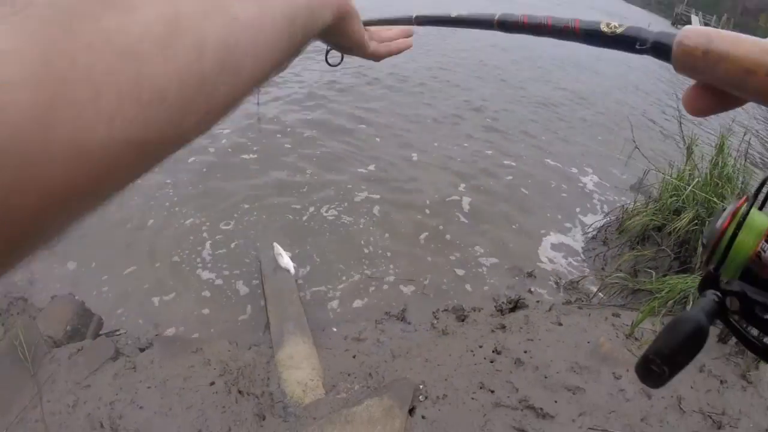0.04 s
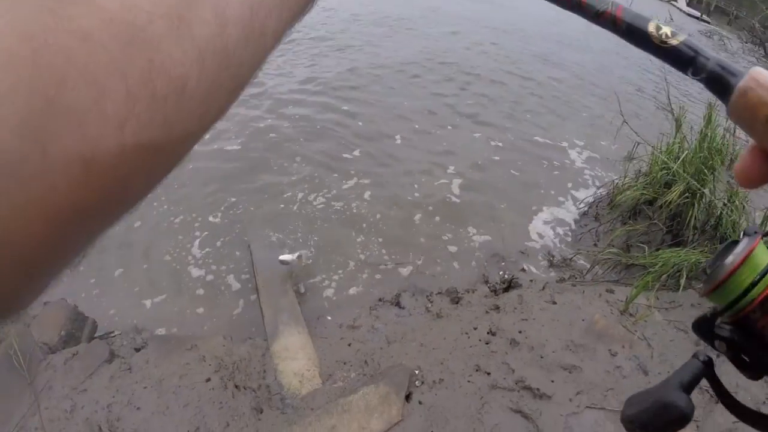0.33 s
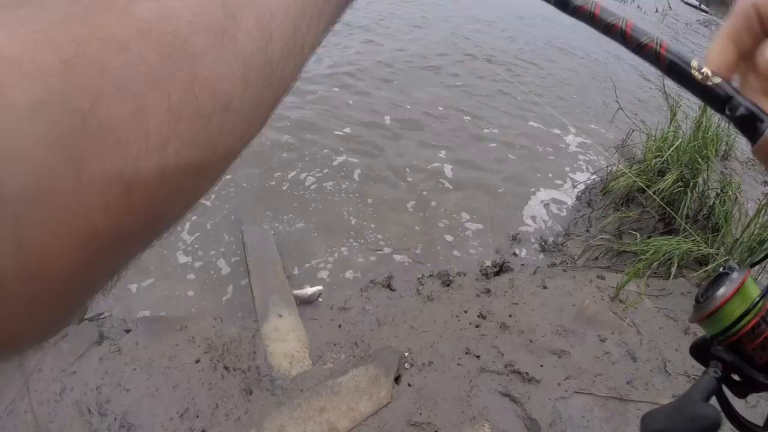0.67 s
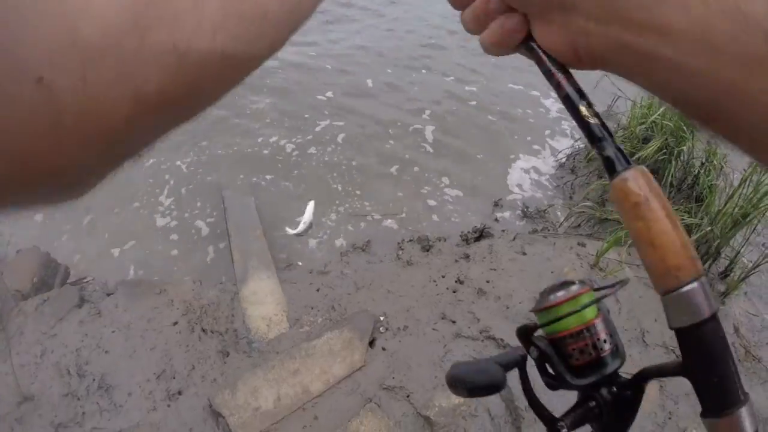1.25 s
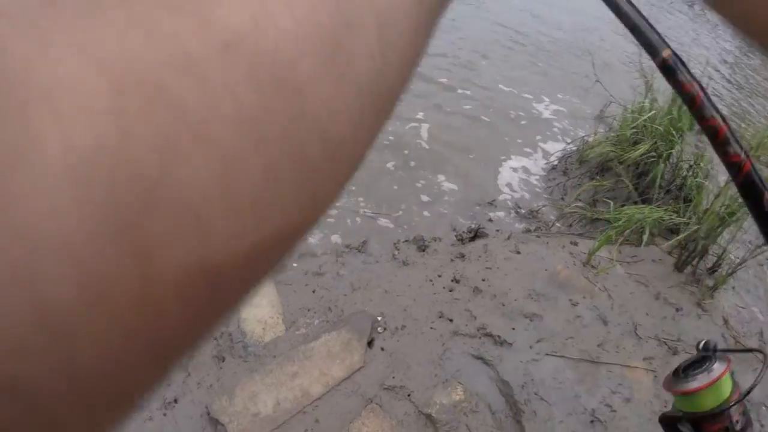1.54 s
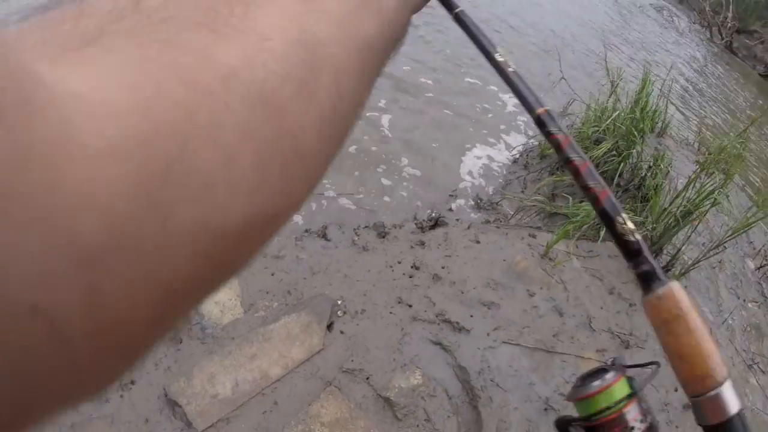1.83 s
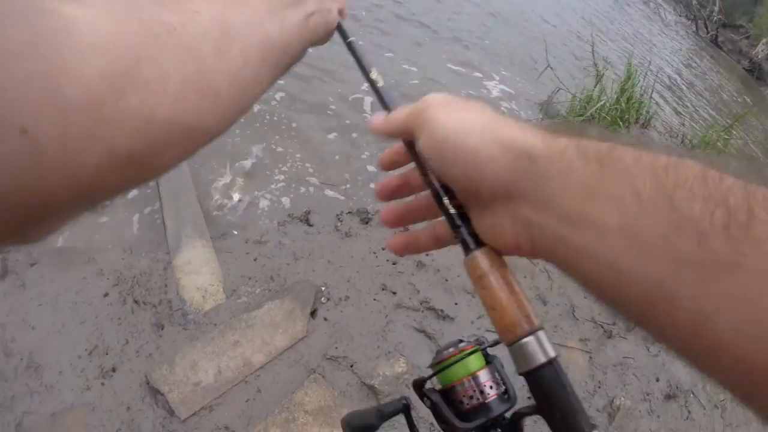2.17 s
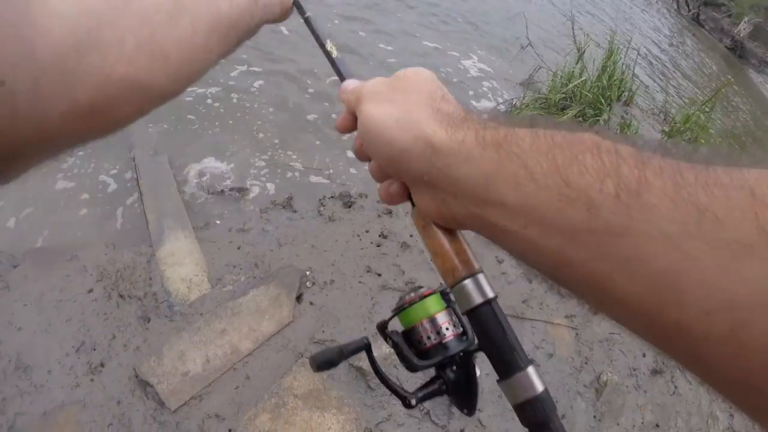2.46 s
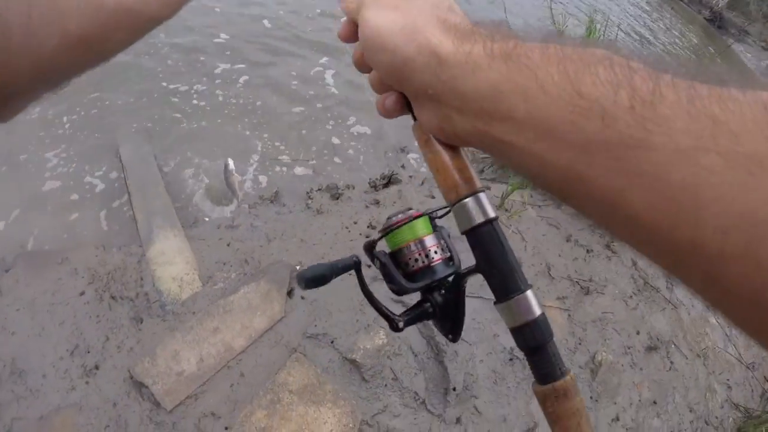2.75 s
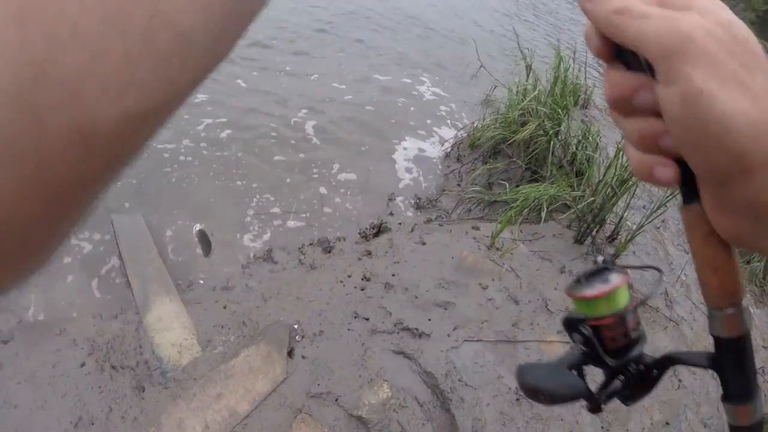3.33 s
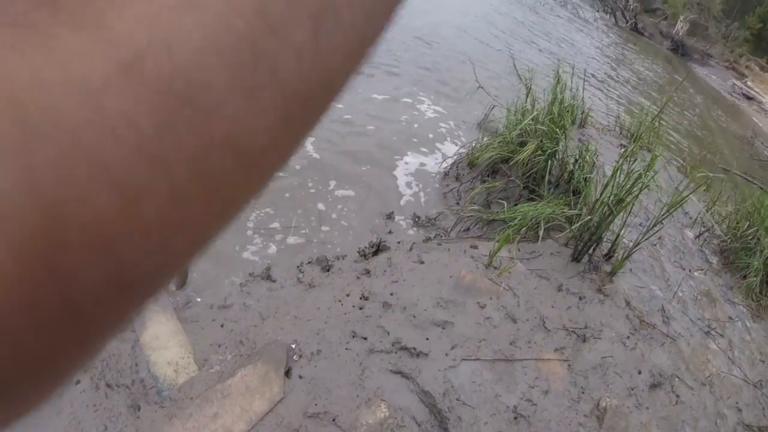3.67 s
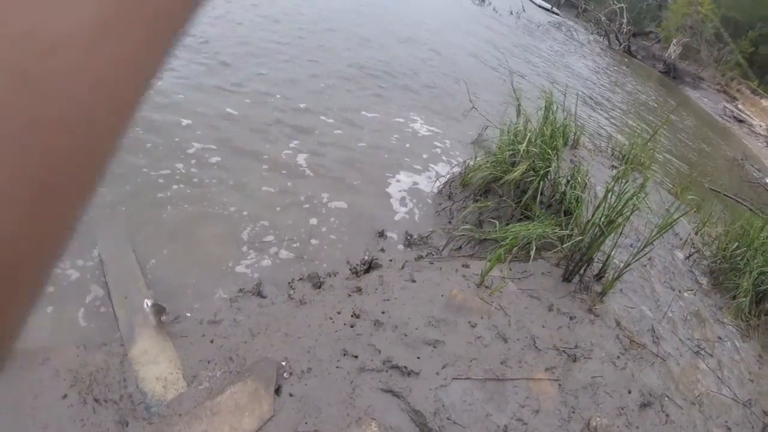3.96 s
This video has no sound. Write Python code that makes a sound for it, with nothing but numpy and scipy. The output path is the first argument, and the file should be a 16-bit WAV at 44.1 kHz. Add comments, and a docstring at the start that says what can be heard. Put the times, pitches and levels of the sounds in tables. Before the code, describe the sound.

A fishing rod and reel knock and click close by over rumbling wind.

```python
"""On a windy riverbank, a fishing rod and spinning reel are handled close to the microphone.
Turbulence rumbles and buffets, water laps faintly, and the wind sets up a low hum, probably in the line.
Friction makes a hand rub and squeak along the grip and the dragging rod scrape. Impacts excite damped
modes: the hand bumps, the steel of the reel ticks, and the rod knocks hollowly a few times.
Dry clicks are scattered throughout, and small wet blips sound in the second half."""
import sys
import numpy as np
from scipy import signal
from scipy.fft import rfft, irfft
from scipy.io import wavfile

SR = 44100
rng = np.random.default_rng(int(sys.argv[2]) if len(sys.argv) > 2 else 0)


def unload_wav(signal):
    """Save mono or channel-first audio to the path in sys.argv[1] as 16-bit WAV at rate SR, clipped to [-1, 1]."""
    wavfile.write(
        sys.argv[1],
        SR,
        np.round(np.clip(np.atleast_2d(signal).T, -1, 1) * 32767).astype(np.int16),
    )


N = 176400
BURST_SAMPLES = 8192


def amp(db):
    """Amplitude ratio of a level in decibels."""
    return 10 ** (np.asarray(db) / 20)


def unit(x):
    """Normalisation to rms 1."""
    return x / np.sqrt(np.mean(x ** 2) + 1e-20)


def curve(rows, column=1):
    """Linear interpolation of one column of a table over time."""
    rows = np.array(rows)
    return np.interp(np.arange(N) / SR, rows[:, 0], rows[:, column])


def add(mix, start, sound):
    """Superposition: a sound joins the mix at a start in seconds."""
    part = mix[max(round(start * SR), 0):][:len(sound)]
    part += sound[:len(part)]


def bins(size):
    """Fourier frequencies, raised by 1 Hz to stay above zero."""
    return np.fft.rfftfreq(size, 1 / SR) + 1


def colour(points, size, tilt_db=0):
    """Spectral envelope in dB, interpolated in log frequency and tilted by tilt_db per octave."""
    hz, db = np.transpose(points)
    return np.interp(np.log(bins(size)), np.log(hz), db) + tilt_db * np.log2(bins(size) / hz.mean())


def filtered(x, gain):
    """Linear filtering: the spectrum is multiplied by a gain at each frequency."""
    return irfft(rfft(x) * gain, len(x))


def noise(points, size=N):
    """Gaussian noise with a given spectral envelope, at rms 1."""
    return unit(filtered(rng.standard_normal(size), amp(colour(points, size))))


def drift(hz):
    """Slow random modulation: low-passed noise at rms 1."""
    return unit(filtered(rng.standard_normal(N), 1 / (1 + (bins(N) / hz) ** 4)))


def dying(t, t60):
    """Exponential damping by 60 dB in t60 seconds."""
    return np.exp(-np.log(1000) * t / t60)


def burst(spectrum_db, t60, top_hz=10900):
    """Contact noise: a dying train of micro-impacts through a minimum-phase filter, dull above top_hz."""
    t = np.arange(BURST_SAMPLES) / SR
    gain = amp(np.maximum(spectrum_db - spectrum_db.max(), -80))
    log_gain = np.log(unit(gain) / (1 + (bins(BURST_SAMPLES) / top_hz) ** 8))
    mirrored = np.r_[log_gain, log_gain[-2:0:-1]]
    response = np.exp(np.conj(signal.hilbert(mirrored)))[:len(gain)]
    impacts = rng.choice([-1., 1.], BURST_SAMPLES) * dying(t, t60)
    return filtered(impacts, response)


def ring(modes, swell_s=0):
    """Free vibration of damped modes; the lowest builds up over swell_s, higher ones faster."""
    t = np.arange(SR // 2) / SR
    out = np.zeros(len(t))
    for k, (hz, db, t60) in enumerate(modes):
        polarity = (-1) ** (k // 2)  # neighbouring pairs swing in opposite directions
        swell = 1 - np.exp(-t * (hz / modes[0][0]) ** 2 / (swell_s + 1e-9))
        out += polarity * amp(db) * swell * dying(t, t60) * np.sin(2 * np.pi * hz * t)
    return out


def wind():
    """Turbulent pressure at the microphone: a rumble, and fine eddies that grow faster in a gust."""
    # Each row: time in seconds, rumble level in dB.
    gusts = [(0, -32.5), (.08, -24.5), (.2, -19), (.5, -22.5), (.8, -23), (1.05, -19.5), (2, -33.5),
             (2.65, -25), (3.25, -31), (3.35, -20.5), (3.62, -19), (4, -16)]
    # Spectra of the rumble and the eddies. Each row: frequency in Hz, relative level in dB.
    rumble_spectrum = [(10, -5.5), (28, 3), (55, 0.5), (90, -2.5), (145, -10), (200, -20.5), (300, -31.5),
                       (600, -70), (1500, -82.5)]
    eddy_spectrum = [(40, -15), (130, 10), (230, 1.5), (350, -17.5), (600, -17.5), (1100, -21.5),
                     (2500, -55), (9000, -73.5)]
    eddy_growth, reference_db = 2.4, -17.5
    gust_db = curve(gusts)
    rumble = amp(gust_db) * noise(rumble_spectrum)
    eddy_db = -34 + eddy_growth * (gust_db - reference_db) + 3.6 * drift(hz=30)
    return rumble + amp(eddy_db) * noise(eddy_spectrum)


def river():
    """Lapping water: broadband noise under slight amplitude modulation."""
    # Each row: frequency in Hz, relative level in dB.
    wash_spectrum = [(120, -13), (200, -2), (420, -4.5), (708, -8), (1050, -17), (1980, -22.5), (3870, -37),
                     (9050, -37.5), (12500, -47), (15000, -59.5)]
    return amp(-46.5 - 0.3 * drift(hz=7.6)) * noise(wash_spectrum)


def hum():
    """Wind-driven vibration: a wavering tone with a faint overtone, rising slightly as the rod lifts."""
    # Each row: time in seconds, frequency in Hz, level in dB.
    tone = [(0, 92, -50), (1.5, 89, -30.5), (1.8, 88.9, -31), (2.03, 95.6, -31), (2.13, 98.5, -24.5),
            (2.35, 100.2, -21.5), (2.48, 101, -26.5), (2.7, 101.8, -28), (3.1, 104.2, -21.5),
            (3.4, 105.8, -28), (4, 106.4, -19.5)]
    hz = curve(tone) * (1 + 0.013 * drift(hz=8.7))
    phase = 2 * np.pi * np.cumsum(hz) / SR
    level_db = curve(tone, column=2) - 1.5 * drift(hz=5.3)
    return amp(level_db) * (np.sin(phase) + amp(-26.5) * np.sin(3.2 * phase))


def rub():
    """Sliding friction of skin on the grip: grainy slips, with squeaks that grow under pressure."""
    # Each row: time in seconds, rubbing level in dB.
    strokes = [(0, -60), (.08, -56), (.15, -55.5), (.22, -57), (.29, -52.5), (.45, -53), (.485, -46.5),
               (.6, -51.5), (.77, -45.5), (.92, -49.5), (1.02, -57), (1.12, -51.5), (1.21, -50.5),
               (1.3, -62), (2.02, -55), (2.17, -48), (2.28, -51), (2.38, -48), (2.52, -50.5), (2.62, -43.5),
               (2.8, -54), (2.9, -46), (3.03, -54), (3.18, -53), (3.35, -59.5)]
    # Each row: frequency in Hz, relative level in dB.
    grip_spectrum = [(200, 4), (600, 15.5), (1200, 2.5), (2500, 3), (4300, 0.5), (5900, -2), (7000, -10),
                     (9500, -11.5), (13000, -25)]
    slips_per_s, spread_db, squeak_growth = 2200, 1.36, 1.25
    slips = (rng.random(N) < slips_per_s / SR) * rng.choice([-1, 1], N)
    strength = amp(spread_db * np.minimum(rng.exponential(1, N), 4))
    roughness = amp(3.7 * drift(hz=59.4))
    grains = unit(filtered(slips * strength * roughness, amp(colour(grip_spectrum, N))))
    rub_db = curve(strokes)
    squeak_db = -48 + squeak_growth * (rub_db - rub_db.max())
    return amp(rub_db) * grains + amp(squeak_db) * squeaks(spread_db)


def squeaks(spread_db, slips_per_s=300, pitches=24, rise_cycles=2.8):
    """Stick-slip motion of skin: each release is a brief oscillation at its own pitch."""
    out, t = np.zeros(N), np.arange(1024) / SR
    for hz in np.geomspace(1000, 5400, pitches):
        slips = rng.random(N) < slips_per_s / pitches / SR
        strength = amp(spread_db * np.minimum(rng.exponential(1, N), 3))
        age = hz * t / rise_cycles
        squeak = age * np.exp(-age) * np.sin(2 * np.pi * hz * t) * np.sqrt(hz)
        out += signal.oaconvolve(slips * strength, squeak)[:N]
    return unit(out)


def scrape():
    """Friction noise of the dragging rod, hollow in colour and uneven in level."""
    # Each row: time in seconds, level in dB.
    drags = [(.065, -71), (.088, -37), (.17, -76), (.64, -70), (.68, -29), (.8, -36), (.93, -32.5),
             (1.1, -81), (1.25, -86)]
    # Each row: frequency in Hz, relative level in dB.
    hollow_spectrum = [(200, -7.5), (500, 4.5), (850, 3.5), (1150, -22.5), (1700, -18.5), (5000, -58.5)]
    return amp(curve(drags) + 2 * drift(hz=50)) * noise(hollow_spectrum)


def clicks():
    """Dry contacts of fingers, line and reel seat, each exciting one broad resonance."""
    # Each row: start in seconds, level in dB, centre in Hz, width in octaves, t60 in seconds.
    contacts = [(0.099, -37, 4100, 0.71, 0.018), (0.166, -35, 4200, 0.92, .022),
                (0.214, -34.5, 3330, 0.35, 0.024), (0.4211, -19.5, 3480, 0.71, 0.0054),
                (0.7026, -31, 1410, 0.18, 0.059), (1.039, -44, 7900, 0.76, 0.0099),
                (1.105, -33.5, 4500, 0.89, 0.02), (1.748, -51, 2340, 0.54, 0.16),
                (2.156, -28.5, 2200, 0.44, 0.0097), (2.2145, -30, 3600, 0.62, 0.011),
                (2.4558, -35, 2280, 1.7, 0.022), (2.5876, -39, 6500, 1.1, 0.019),
                (2.599, -33, 3830, 0.51, 0.0096), (2.674, -37.5, 4370, 0.28, 0.029),
                (2.8571, -35.5, 4003, 0.7, 0.02), (2.9505, -36.5, 4100, 0.29, 0.026),
                (3.821, -37, 2840, 0.54, 0.0075)]
    out = np.zeros(N)
    for start, db, hz, octaves, t60 in contacts:
        detuning = np.log2(bins(BURST_SAMPLES) / hz) / octaves
        resonance_db = -36 * np.log10(1 + detuning ** 2)
        add(out, start, amp(db) * burst(resonance_db, t60))
    return out


def bumps():
    """Soft impacts of the hand on the rod excite two low, heavily damped modes."""
    # Each row: start in seconds, then the lower mode's level in dB, frequency in Hz and t60 in seconds.
    impacts = [(0.104, -19.5, 162, 0.13), (0.969, -20, 167, 0.16), (1.723, -25.5, 323, 0.056),
               (2.157, -22.5, 295, 0.083), (2.453, -24.5, 230, 0.052)]
    out = np.zeros(N)
    for start, db, hz, t60 in impacts:
        add(out, start, amp(db) * ring([(hz, 0, t60), (1.425 * hz, -4, t60 / 2)]))
    return out


def buffets():
    """Single pressure pulses of the wind: low-frequency noise under a Gaussian envelope."""
    # Each row: peak time in seconds, level in dB, half length in seconds, low-pass corner in Hz.
    pulses = [(0.121, -15, 0.016, 159), (0.282, -16, 0.01, 79), (0.433, -13.5, 0.016, 95),
              (0.534, -16.5, 0.011, 125), (0.624, -12.5, 0.0089, 69.6), (0.804, -12, 0.011, 136),
              (0.982, -16, 0.023, 180), (1.068, -23.5, 0.038, 197), (1.452, -15.5, 0.013, 69),
              (2.701, -17, 0.015, 69), (3.465, -16.5, 0.0056, 147), (3.692, -25.5, 0.025, 217.3),
              (3.795, -10.5, 0.0065, 203), (3.905, -25, 0.037, 234), (3.968, -12.5, 0.0083, 179)]
    out, t = np.zeros(N), np.arange(SR // 4) / SR
    hz, taper = bins(len(t)), signal.windows.tukey(len(t), .5)
    for peak_s, db, half_s, corner_hz in pulses:
        envelope = np.exp(-.5 * ((t - t.mean()) / half_s) ** 2)
        passband = hz / (hz + 15) / (1 + (hz / corner_hz) ** 3.52)
        puff = filtered(envelope * rng.standard_normal(len(t)), passband)
        envelope_rms = np.sqrt(np.mean(envelope ** 2))
        add(out, peak_s - t.mean(), amp(db) * envelope_rms * unit(puff * taper))
    return out


def reel():
    """Metal impacts: a tick, a clink and a thin ring whose modal balance depends on the point struck."""
    # Each row: start in seconds, tick level in dB, tick tilt in dB per octave, clink level in dB,
    # ring level in dB, ring tilt in dB per octave.
    strikes = [(0.2083, -23, 5, -36, -53, -4), (0.2669, -27, 8, -45, -60, 0),
               (1.5164, -27.5, 13.5, -50, -63, 4), (1.8430, -31, 8, -41, -59, 2),
               (3.4266, -27, 17, -40, -57.5, -17), (3.6104, -33, 9, -58, -54.5, -5),
               (3.978, -32, 6, -35.5, -64, 2)]
    # Each row: frequency in Hz, relative level in dB.
    tick_spectrum = [(800, -51), (2000, 8), (4000, -2.5), (5800, 8), (7800, -8), (10000, -3), (12000, -24),
                     (15000, -20.5)]
    # Each row: frequency in Hz, relative level in dB, t60 in seconds.
    steel_modes = [(4517, 1, .2), (6708, -7, .21), (10710, -2, .2), (13290, -15, .14)]
    clink_hz, clink_t60 = 5320, 0.016
    out, lowest_hz = np.zeros(N), steel_modes[0][0]
    for start, tick_db, tick_tilt, clink_db, ring_db, ring_tilt in strikes:
        spectrum_db = colour(tick_spectrum, BURST_SAMPLES, tick_tilt)
        modes = [(hz, db + ring_tilt * np.log2(hz / lowest_hz), t60) for hz, db, t60 in steel_modes]
        add(out, start, amp(tick_db) * burst(spectrum_db, t60=0.0049, top_hz=13400))
        add(out, start, ring([(clink_hz, clink_db, clink_t60)]))
        add(out, start, amp(ring_db) * ring(modes))
    return out


def knocks():
    """Impulse response of the rod: a crack, a rattle of loose parts, hollow modes and a diffuse tail."""
    # Each row: start in seconds, ring level in dB, crack level in dB, crack t60 in seconds,
    # crack tilt in dB per octave.
    strikes = [(0.33, -14, -11, 0.0061, 3.5), (0.6539, -25, -16, 0.023, -3.5), (.7031, -48, -24, 0.017, 8),
               (.7165, -26.5, -26.5, 0.05, 0.5), (0.8464, -31.5, -31.5, 0.029, 0),
               (.8982, -45, -32, 0.019, 6)]
    # Each row: frequency in Hz, relative level in dB, t60 in seconds.
    rod_modes = [(392, 2, .22), (487, 0, .22), (571, 3.5, .23), (618, -3, .18), (705, -4, .17),
                 (810, -13, .13), (985, -13, .17), (1330, -21, .18), (1588, -17, .09)]
    # Spectra of the crack and the tail. Each row: frequency in Hz, relative level in dB.
    crack_spectrum = [(300, -6), (900, -22), (1250, -2.5), (1700, 2), (2050, -1), (2370, 0.5), (2750, -4),
                      (3150, -2), (3730, 2.5), (4700, -12.5), (5800, -14), (8300, -24.5), (12000, -37)]
    tail_spectrum = [(150, -12.5), (330, 1), (560, 3.5), (850, -11.5), (1150, -27), (1700, -29.5),
                     (8000, -83)]
    out, t = np.zeros(N), np.arange(SR) / SR
    tail_envelope = dying(t, t60=0.33) * (1 - np.exp(-t / 0.00054))
    for start, ring_db, crack_db, crack_t60, tilt_db in strikes:
        spectrum_db = colour(crack_spectrum, BURST_SAMPLES, tilt_db)
        crack = burst(spectrum_db, crack_t60)
        rattle = amp(-13.5) * burst(spectrum_db, t60=0.062)
        add(out, start, amp(crack_db) * (crack + rattle))
        add(out, start, amp(ring_db) * ring(rod_modes, swell_s=0.0049))
        add(out, start, amp(ring_db + 2) * noise(tail_spectrum, size=SR) * tail_envelope)
    return out


def blips(rise_s=0.0017, octaves_per_s=6.6):
    """Small wet blips: damped oscillations with a soft onset and a slight upward glide."""
    # Each row: start in seconds, peak level in dB, starting frequency in Hz.
    events = [(2.228, -34.5, 2620), (2.38, -33, 1710), (2.737, -37.5, 2090), (2.9033, -36.5, 1810),
              (2.985, -39.5, 1475), (3.279, -42, 1580), (3.858, -33.5, 980)]
    out, t = np.zeros(N), np.arange(2048) / SR
    age = t / rise_s
    for start, db, hz in events:
        phase = 2 * np.pi * np.cumsum(hz * 2 ** (octaves_per_s * t)) / SR
        add(out, start, amp(db) * age * np.exp(1 - age) * np.sin(phase))
    return out


def scene():
    """Superposition of all sources at one microphone."""
    background = wind() + river() + hum()
    return (background + rub() + scrape() + clicks() + bumps() + buffets() + reel() + knocks()
            + blips())[None]


def record(dry, cutoff_hz=15200):
    """Band limiting: the sound is briefly faded at both ends and low-passed."""
    faded = dry * signal.windows.tukey(N, .002)
    lowpass = signal.firwin(127, cutoff_hz, window=("kaiser", 8), fs=SR)
    return signal.oaconvolve(faded, lowpass[None], "same")


dry = scene()
out = record(dry)
unload_wav(out)
```